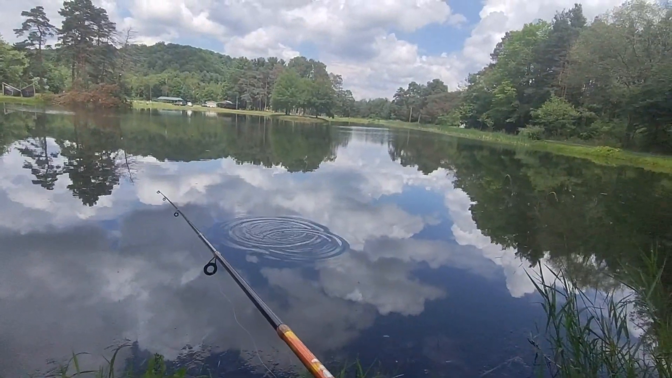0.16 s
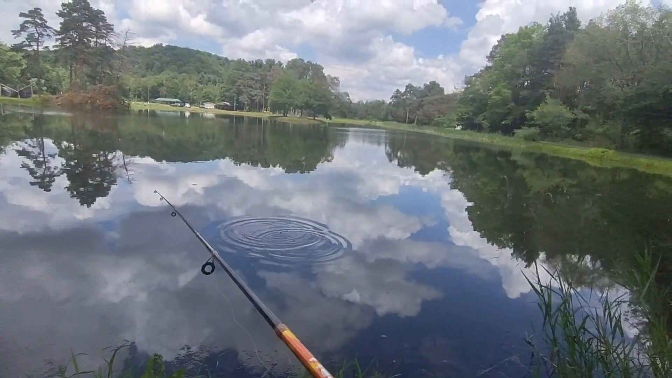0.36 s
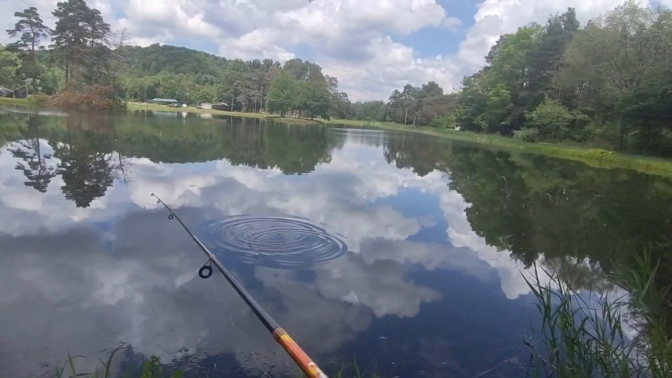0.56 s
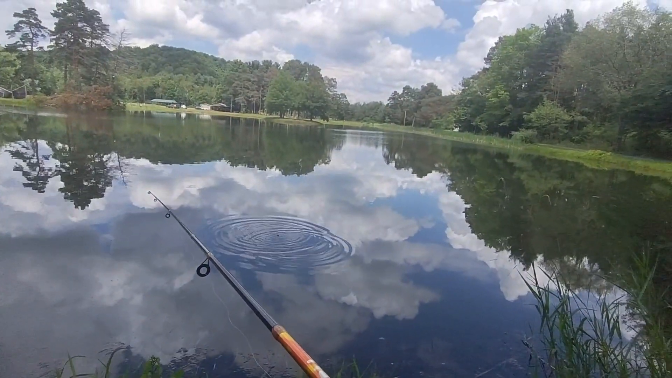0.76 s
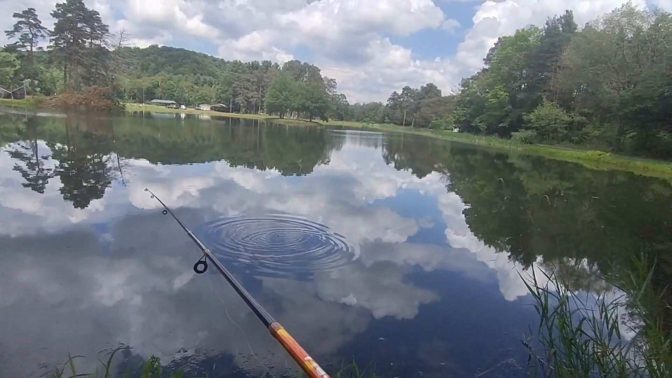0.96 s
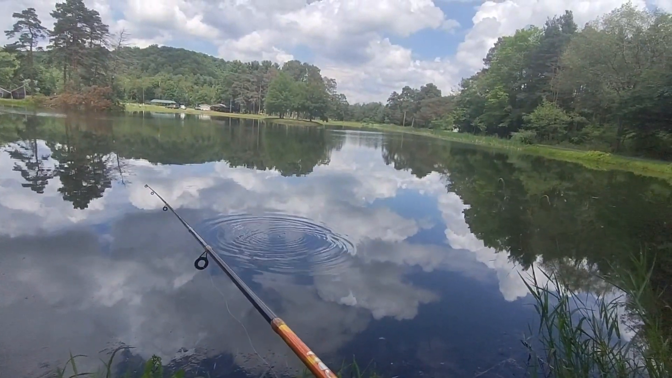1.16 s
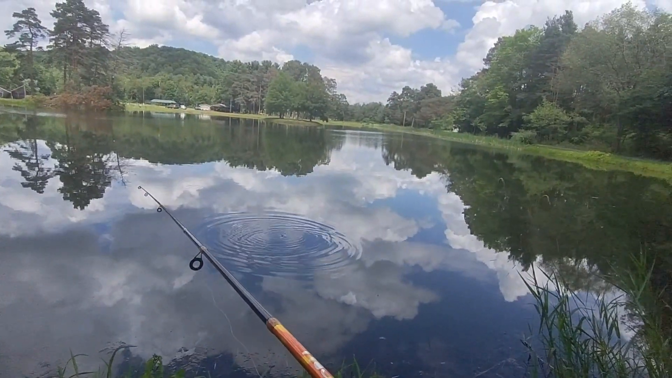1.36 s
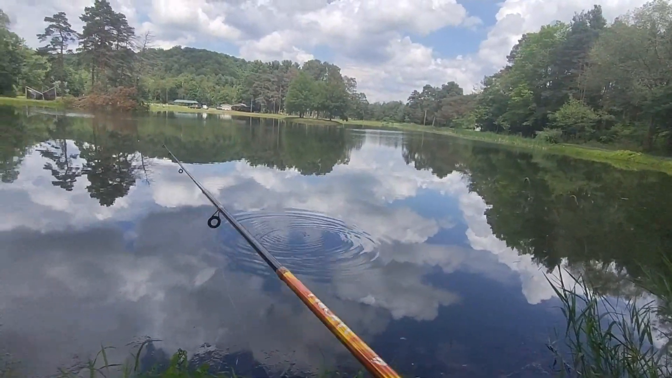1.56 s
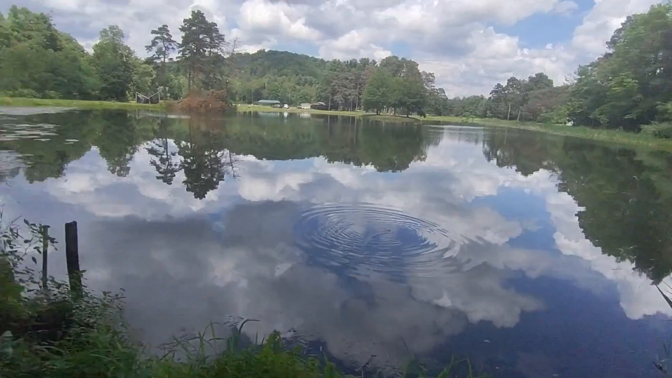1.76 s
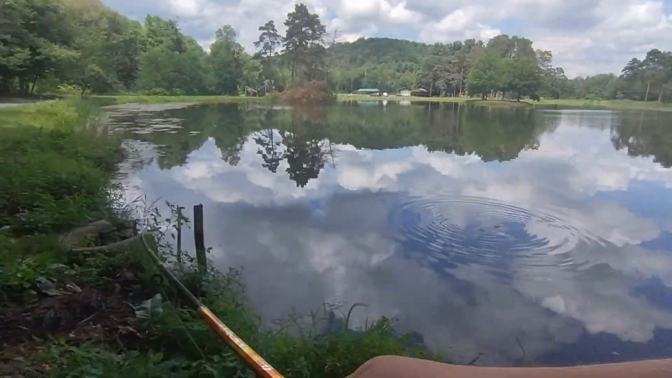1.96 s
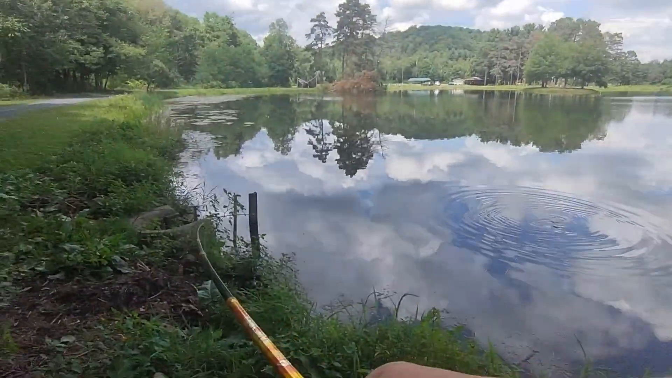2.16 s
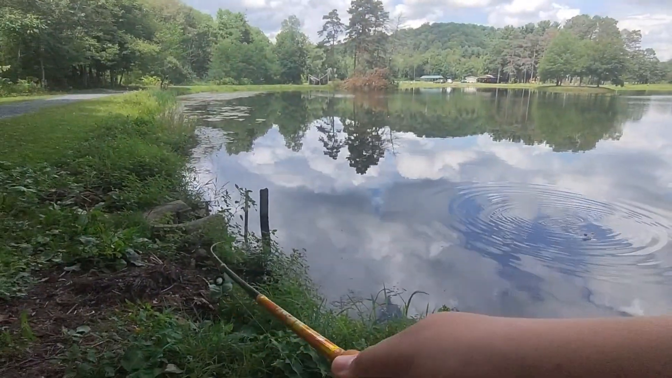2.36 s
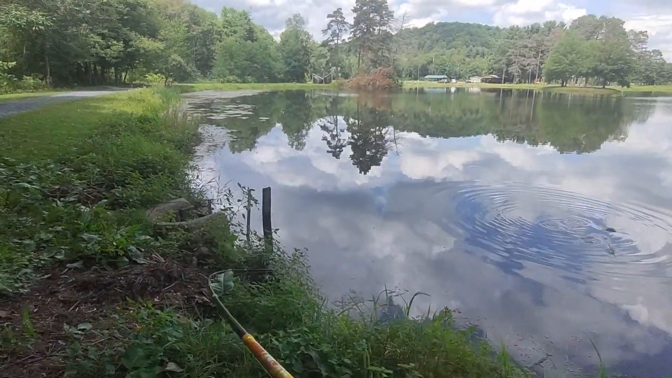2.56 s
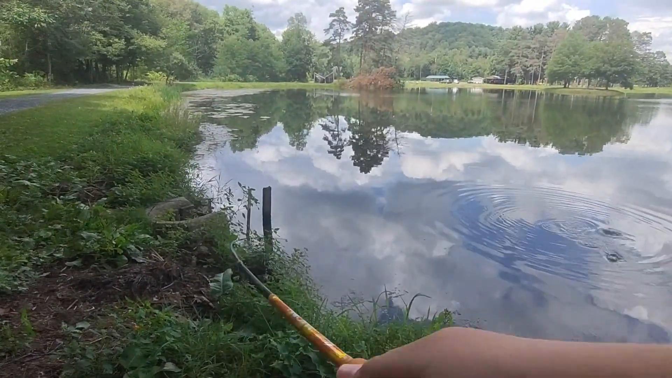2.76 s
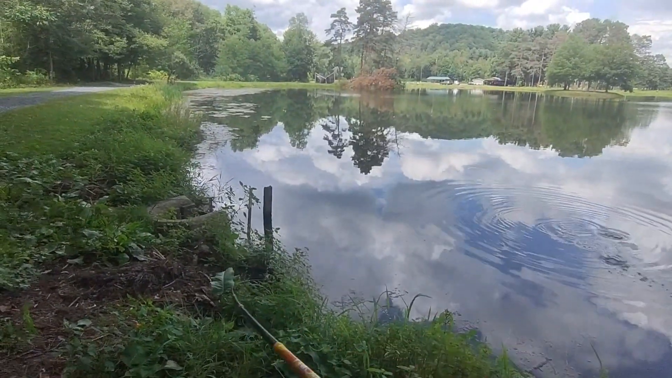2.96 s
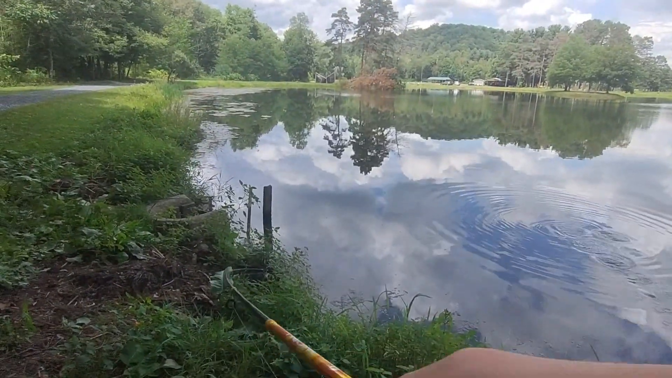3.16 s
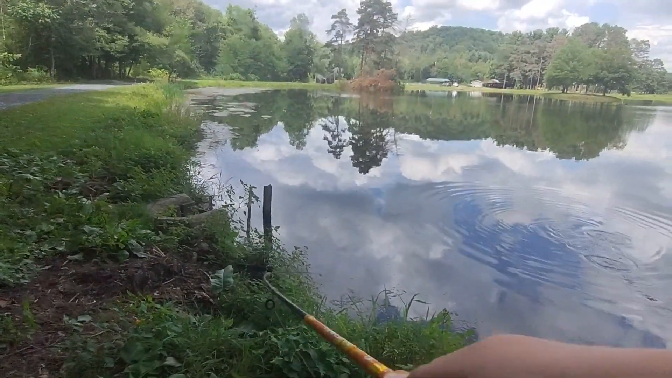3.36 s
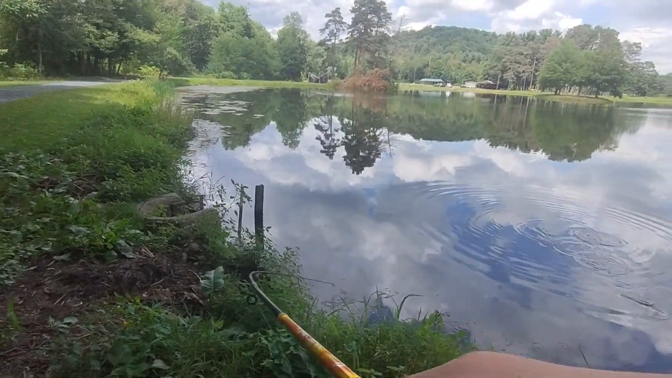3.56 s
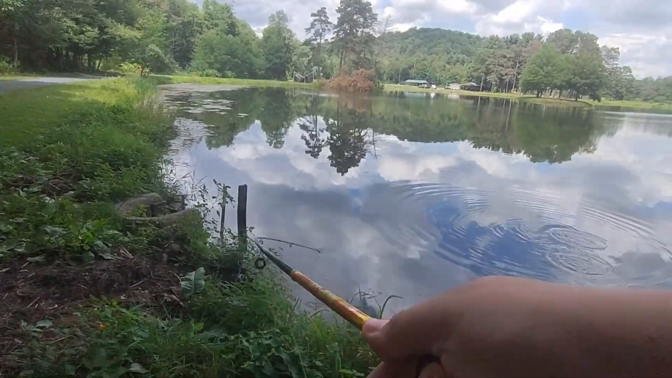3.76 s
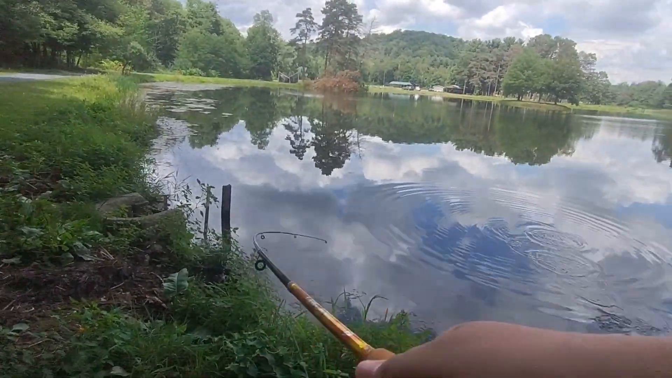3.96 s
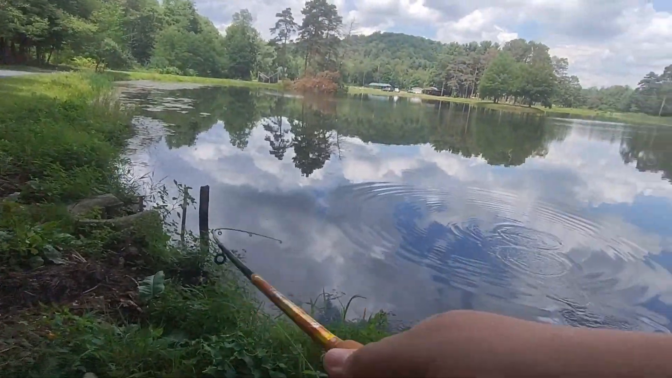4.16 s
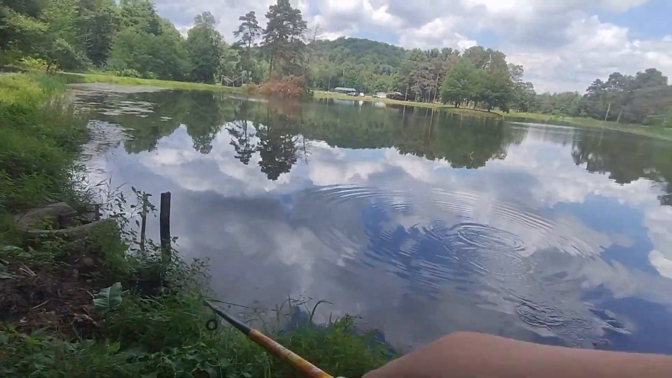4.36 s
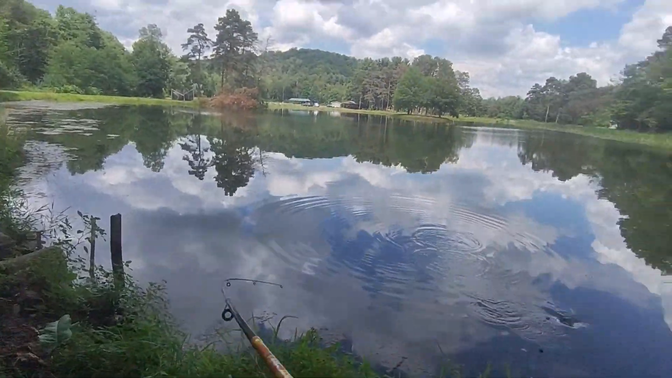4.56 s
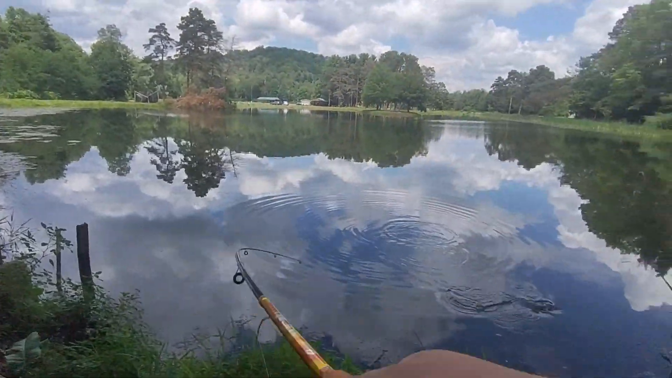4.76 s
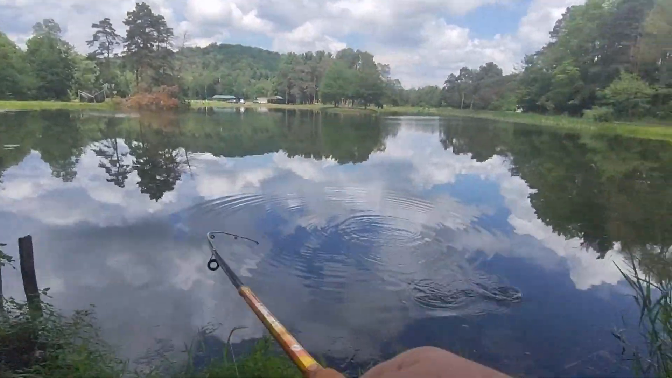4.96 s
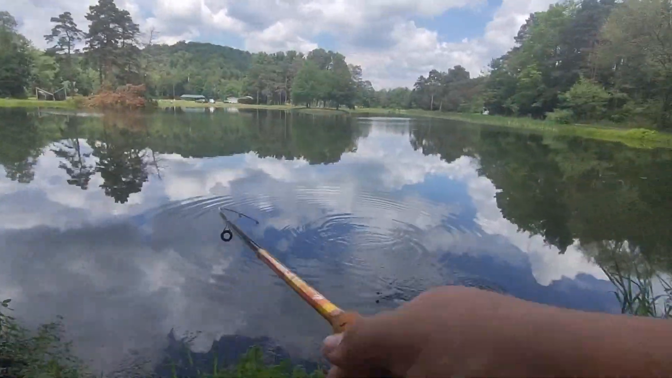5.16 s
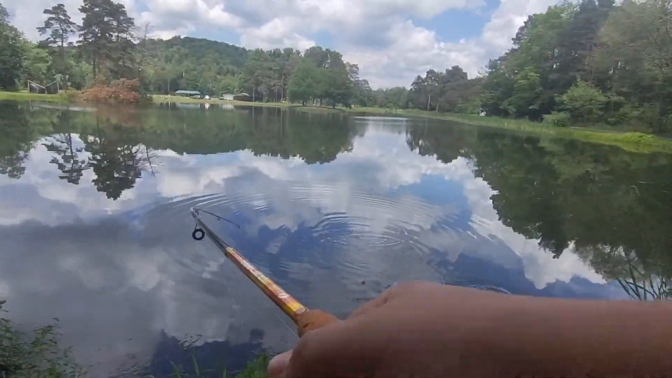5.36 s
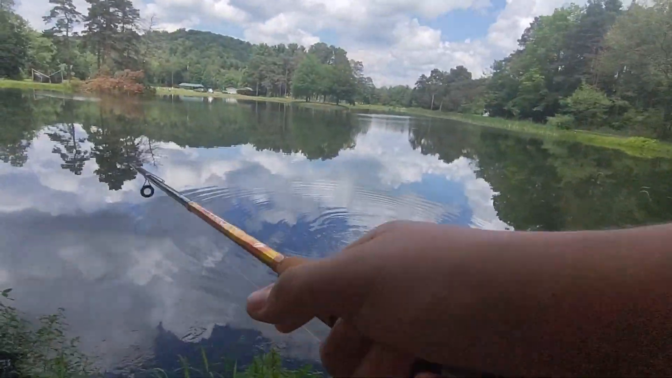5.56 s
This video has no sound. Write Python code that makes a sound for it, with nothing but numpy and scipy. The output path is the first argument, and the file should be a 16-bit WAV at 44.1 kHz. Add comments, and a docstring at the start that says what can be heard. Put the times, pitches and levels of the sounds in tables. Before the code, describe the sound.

A high insect chorus over faint hum, then close grip rustles, bright reel clicks in short bursts, sharp clacks and tiny squeaks.

```python
"""A fishing reel is worked close by: toothed clicks ring its spool in runs, sharp clacks shake it all.
The hand rumbles and rubs, the winding gear hisses, a dry bearing whistles and dull bumps ring briefly.
Beside the pond behind it, insects sing: filtered noise makes a hazy far chorus over a low hum,
wing strokes make one throbbing trill, and a comb of overtones makes one steady buzz.
Two microphone ports hear the treble very differently."""
import sys
import numpy as np
from scipy import signal
from scipy.fft import rfft, irfft, next_fast_len
from scipy.io import wavfile
from scipy.ndimage import uniform_filter1d, map_coordinates

SR = 44100
rng = np.random.default_rng(int(sys.argv[2]) if len(sys.argv) > 2 else 0)


def wav_record(signal):
    """Record a signal, one row per channel, as 16-bit PCM in the file named by sys.argv[1]."""
    frames = np.transpose(np.atleast_2d(signal))
    bounded = np.clip(frames, -1, 1)
    # unit amplitude maps onto the largest positive 16-bit level
    quanta = np.round(bounded * 32767).astype(np.int16)
    wavfile.write(sys.argv[1], SR, quanta)


def volts(x):
    """Linear amplitude factor 10**(x/20) for a level x in dB, scalar or array-like."""
    e = np.asarray(x, float) / 20
    return 10 ** e


N = 247401  # length in samples


def along(points, hz):
    """Reads a curve of (pitch_hz, value) points, spacing pitch as the ear does (log axis)."""
    point_hz, value = np.transpose(points)
    return np.interp(np.log(hz + 1), np.log(point_hz + 1), value)


def curves(rows):
    """Joins the rows by straight lines: one value per sample for each column after the time."""
    time_s, *columns = np.transpose(rows)
    return [np.interp(np.arange(N) / SR, time_s, column) for column in columns]


def unit(x):
    """Scales a sound to rms 1."""
    return x / np.sqrt(np.mean(x ** 2) + 1e-20)


def wobble(rate):
    """A smooth random curve through rate random points a second."""
    points = rng.standard_normal(int(N * rate / SR) + 4)
    return map_coordinates(points, [np.arange(N) * rate / SR])


def filtered(x, response):
    """Multiplies the spectrum of x by a complex response of frequency."""
    size = next_fast_len(N + 8192)
    return irfft(rfft(x, size) * response(np.fft.rfftfreq(size, 1 / SR)), size)[..., :N]


def modes(table):
    """Response of resonances given as (pitch_hz, width_hz, level_db), one row each, with signs alternating."""
    center, width, db = np.transpose(table)[:, :, None]
    sign = (-1.) ** np.arange(len(table))[:, None]
    return lambda f: sign * volts(db) * 1j * f * width / (center * center - f * f + 1j * f * width)


def body(x, table):
    """Sends x through all the resonances, twice, so that the skirts fall steeply."""
    return filtered(x, lambda f: modes(table)(f).sum(0) ** 2)


def rush(spectrum, patchy_db):
    """Stereo noise of rms 1 with patches of random gain; how alike the sides are depends on pitch."""
    # columns: pitch_hz, left-right likeness (1 = same, 0 = unrelated, below 0 = partly opposite)
    likeness = [(60, 0.18), (300, 0.62), (1200, -0.072), (3000, -0.11)]
    grid = signal.stft(rng.standard_normal((2, N)), nperseg=512)[2]
    patches = rng.standard_normal(grid.shape[1:])
    patches = uniform_filter1d(patches, size=6, axis=0)  # spread over pitch
    patches = uniform_filter1d(patches, size=10, axis=1)  # spread over time
    pair = signal.istft(grid * volts(patchy_db * unit(patches)), nperseg=512)[1][:, :N]

    def mid_side(hz):
        angle = np.arccos(np.clip(along(likeness, hz), -1, 1)) / 2
        return volts(along(spectrum, hz)) * [np.cos(angle), np.sin(angle)]

    mid, side = filtered(pair, mid_side)
    return unit(np.array([mid + side, mid - side]))


def pulses(rate, sharp):
    """A peak once per cycle of the rate curve in Hz, narrower as sharp grows."""
    return np.exp(sharp * (np.cos(2 * np.pi * np.cumsum(rate) / SR) - 1))


def later(x, lag_s, own_db):
    """The far port hears x later, with scattered reflections of its own."""
    t = np.arange(400) / SR
    path = volts(own_db - 60 * t / 0.77) * rng.standard_normal(len(t))
    path[0] = 1  # the direct sound
    far = np.pad(x, (round(lag_s * SR), 0))
    return np.array([x, signal.fftconvolve(far, path / np.linalg.norm(path))[:N]])


def air():
    """Distant hum with one low drone, and many far insects merged into a hiss."""
    # background over time: time_s, chorus level_db (raised and wobbled below), far hum level_db
    air_levels = [(0, -43, -66), (.4, -46, -68.5), (1.85, -43, -66), (2.1, -38, -55), (3.4, -38.5, -57),
                  (4.6, -36.5, -58.5), (5.61, -39, -58.5)]
    # tone colour of the hum and of the chorus: pitch_hz, relative level_db per Hz
    hum_colour = [(25, -24), (65, -3), (695, -10.5), (777, -6.5), (991, -15.5), (2150, -9.5), (2690, -25),
                  (3300, -19), (5000, -7), (6500, -39), (11000, -120)]
    chorus_colour = [(2650, -37), (5200, -24.5), (6200, -12), (8300, 0), (9200, -8), (11600, -25),
                     (14200, -23), (14500, -72)]
    chorus_db, hum_db = curves(air_levels)
    near, around = volts(chorus_db + 1.5 + 0.52 * wobble(8.3)) * rush(chorus_colour, patchy_db=2.5)
    chorus = later(near, lag_s=.0005, own_db=-30)
    chorus = chorus + [[0], [.9]] * around  # the right port adds insects of its own
    drone_hz = 65 + 4 * wobble(8)
    drone = volts(-13 + 5 * wobble(12)) * np.sin(2 * np.pi * np.cumsum(drone_hz) / SR)
    hum = rush(hum_colour, patchy_db=2)
    return volts(hum_db) * (hum + drone) + chorus


def trill():
    """Wing strokes, part tone and part rasp, swell and fade in a fast throb."""
    # the song over time: time_s, level_db (raised and wobbled below), pitch_hz (wobbled below)
    trill_line = [(0, -59.5, 7970), (.5, -55, 8080), (.66, -51, 8460), (1.5, -47.5, 8450), (1.8, -46, 8460),
                  (1.92, -73, 8460)]
    # resonances of the rasp: pitch_hz, width_hz, level_db (each applied twice)
    rasp_modes = [(7440, 230, -9), (8580, 240, -9)]
    stroke_hz, throb_hz = 268.3, 51.5 + 0.43 * wobble(4.3)
    level_db, pitch_hz = curves(trill_line)
    strokes = pulses(np.full(N, stroke_hz), sharp=0.46) * pulses(throb_hz, sharp=0.94)
    tone = np.sin(2 * np.pi * np.cumsum(pitch_hz + 20 * wobble(60)) / SR)
    rasp = unit(body(rng.standard_normal(N), rasp_modes))
    song = unit(strokes * (2.6 * tone + rasp))
    return later(volts(level_db + 4.0 + 0.78 * wobble(6.4)) * song, lag_s=.0005, own_db=-26)


def buzz():
    """Regular snaps, built as a comb of overtones; as with echoes, each fades in and out and one region lifts."""
    # the song over time: time_s, level_db (raised below), loudest pitch_hz
    buzz_line = [(0, -72, 9400), (1.85, -62, 9400), (2.6, -48, 8535), (3.4, -46.5, 8545), (4.0, -48, 8985),
                 (4.65, -44, 8985), (4.75, -50, 7350), (5.0, -50, 7000), (5.12, -45, 8610),
                 (5.6, -47, 8560)]
    # snapping speed: time_s, pulses per second
    snap_rate = [(.5, 204.6), (2.6, 203.1), (3.3, 203.5), (4.3, 204.2), (4.7, 204.3), (5.3, 205)]
    # tone colour: pitch_hz, relative level_db
    buzz_colour = [(6400, -17.5), (7200, -12), (8600, -9.5), (9600, -9.5), (10200, -32)]
    level_db, loud_hz = curves(buzz_line)
    rate, = curves(snap_rate)
    turn = 2 * np.pi * np.cumsum(rate) / SR
    song = np.zeros(N)
    for k in range(31, 51):  # only the high overtones
        lift_db = 9 / (1 + ((k * rate - loud_hz) / 150) ** 2)
        fade_db = 3 * wobble(2.5) + 1.5 * wobble(25)
        overtone = np.sin(k * turn + .5 * wobble(5))
        song += volts(along(buzz_colour, k * rate) + lift_db + fade_db) * overtone
    return later(volts(level_db + 8.5) * unit(song), lag_s=.0003, own_db=-45)


def hand():
    """Rumble through the body, grainy rubbing of grip and cloth, and the hiss of the winding gear."""
    # the hand shifts on the grip, each rub a swell: time_s of the peak, rubbing level_db (raised below)
    rubs = [(2.042, -45), (2.284, -47), (2.704, -43), (3.116, -48), (3.31, -51.5), (3.62, -53),
            (3.85, -52.5), (4.753, -46.5), (5.081, -47.5), (5.45, -48)]
    # winding hiss over time: time_s, level_db (raised and wobbled below)
    winding_line = [(2.2, -80), (2.42, -53.5), (2.6, -69.5), (3.0, -53.5), (3.2, -61), (3.35, -53),
                    (3.45, -66), (3.62, -57.5), (3.85, -48.5), (3.91, -65), (4.04, -51), (4.55, -64),
                    (4.75, -58.5), (5.2, -75), (5.6, -57.5)]
    # tone colour of the rumble and of the rubbing: pitch_hz, relative level_db per Hz
    rumble_colour = [(60, -43), (150, 4.5), (380, -1), (900, -30.5), (2000, -20)]
    grip_colour = [(300, -31.5), (780, -6.5), (1300, -8.5), (2450, -0.5), (3000, -9.5), (5000, -8.5),
                   (14200, -16), (14500, -80)]
    # resonance of the winding gear: pitch_hz, width_hz, level_db (applied twice)
    gear_modes = [(3530, 680, 0)]
    rise_s, fall_s = 0.045, 0.047  # of each rub
    louder_s, change_s = 1.857, 0.051  # when the whole scene grows louder, and how fast the rubbing does
    before_db, steady_db = -84, -56  # rubbing level before, and steady level after (raised below)
    t = np.arange(N) / SR
    rubbing = volts(before_db) + volts(steady_db) * (1 + np.tanh((t - louder_s) / change_s)) / 2
    for peak_s, db in rubs:
        width_s = np.where(t < peak_s, rise_s, fall_s)
        rubbing = np.hypot(rubbing, volts(db) * np.exp(-.5 * ((t - peak_s) / width_s) ** 2))
    rubbing_db = 20 * np.log10(rubbing)
    winding_db, = curves(winding_line)
    rumble_db = 0.83 * (rubbing_db + 52.0) - 59.0 + 1.1 * wobble(25)
    rumble = volts(rumble_db) * rush(rumble_colour, patchy_db=4.0)
    grip = volts(rubbing_db + 4.5 + 1.5 * wobble(300)) * rush(grip_colour, patchy_db=4)
    gear = unit(body(rng.standard_normal((2, N)), gear_modes))
    return rumble + grip + volts(winding_db + 6.5 + 4.5 * wobble(40)) * gear


def bumps():
    """Soft contacts on the rod or the body: a few damped cycles and a dull scuff."""
    # start_s, relative level_db, pitch_hz
    bump_list = [(0.976, -49.5, 575), (1.103, -43.5, 460), (1.796, -35.5, 333), (2.07, -35.5, 335),
                 (2.122, -40, 1120), (2.996, -36.5, 790), (5.046, -34, 723), (5.066, -31, 376),
                 (5.076, -32.5, 387), (5.078, -37, 1180), (5.094, -37, 400), (5.096, -39, 1080),
                 (5.291, -42, 960)]
    out, t = np.zeros(N + SR), np.arange(SR // 20) / SR
    for start_s, db, hz in bump_list:
        ring = np.sin(2 * np.pi * hz * t)
        grain = np.hanning(100) * np.sin(3 * np.pi * hz * t[:100]) / 30
        scuff = 1.8 * np.convolve(rng.standard_normal(len(t)), grain, "same")
        fade = volts(db + 1.5 - 60 * t / 0.031) * (1 - np.exp(-t / 0.0012)) ** 2
        out[round(start_s * SR):][:len(t)] += fade * (ring + scuff)
    return out[:N] * volts([[-1.5], [1.5]])  # left, right


def squeaks():
    """A dry bearing whistles briefly: a flat-topped tone with its octave."""
    # start_s, length_s, pitch_hz, relative level_db
    squeak_list = [(2.299, 0.0053, 5240, -30.5), (2.798, 0.0078, 5507, -18), (3.661, 0.0068, 5650, -36),
                   (3.811, 0.0055, 6070, -15), (4.869, 0.0064, 5930, -38.5)]
    out, t = np.zeros(N + SR), np.arange(SR // 20) / SR
    for start_s, length_s, hz, db in squeak_list:
        swell = 1 / (1 + np.exp((.0015 - t) / .0006)) / (1 + np.exp((t - length_s) / .0008))
        turn = 2 * np.pi * hz * t
        octave = .14 * np.exp(-t / .005) * np.sin(2 * turn)
        out[round(start_s * SR):][:len(t)] += volts(db + 4.5) * swell * (np.sin(turn) + octave)
    return later(out[:N], lag_s=0.00013, own_db=-27.0) * volts([[3], [-5]])  # left, right


def blows(events, table, rise_s, fall_s, scatter_db):
    """Each blow is a dying flurry of sharp contacts; it rings every mode at a new strength and pitch."""
    mode_wander = .012  # typical random shift, as a fraction of the pitch
    t = np.arange(-256, 768) / SR
    tail = .2 * np.exp(-np.abs(t) / .008)
    shape = np.where(t < 0, np.exp(t / rise_s), np.exp(-(t / fall_s) ** 2) + tail)
    hz = np.fft.rfftfreq(len(t), 1 / SR)
    out = np.zeros((2, N + len(t)))
    for hit_s, db in events:
        strength, shift = rng.standard_normal((2, len(table), 1))
        ringing = modes(table)(hz * (1 + mode_wander * shift))
        colour = (volts(scatter_db * strength) * ringing).sum(0)
        grit = rng.standard_normal((2, len(t)))
        contacts = shape * grit * np.abs(grit)
        near, other = irfft(rfft(contacts) * colour)
        far = 0.4 * np.roll(near, shift=6) + 2.14 * other  # later, and only partly alike
        loudest = np.sort(np.abs(near))[-8]  # skips the seven most extreme samples
        out[:, round((hit_s + t[0]) * SR):][:, :len(t)] += volts(db) * np.array([near, far]) / loudest
    return out[:, :N]


def teeth(first_s, last_s, count, speed_ratio, first_db, last_db):
    """The spool speeds up or slows evenly during a pull; each tooth comes a little off time and strength."""
    jitter_s, scatter_db = .0005, 2.5
    passed = np.linspace(0, 1, round(count))  # share of the teeth gone by
    speed = np.sqrt(1 - (1 - speed_ratio ** 2) * passed)
    chance = rng.standard_normal((len(passed), 2))
    even_s = first_s + (last_s - first_s) * (1 + speed_ratio) * passed / (1 + speed)
    tooth_s = even_s + jitter_s * chance[:, 0]
    tooth_db = first_db + (last_db - first_db) * passed + scatter_db * chance[:, 1]
    return list(zip(tooth_s, tooth_db))


def reel():
    """The clicker's teeth ring the spool, single clicks without its lowest mode; clacks shake the whole reel."""
    # pulls on the line that run the clicker over its teeth: first tooth start_s, last tooth start_s,
    # teeth, end speed over start speed, first level_db, last level_db (levels before the low cut)
    pulls = [(2.104, 2.161, 6, 0.96, -22.5, -18.5), (2.5603, 2.618, 7, 0.67, -8, -13),
             (3.417, 3.4707, 6, 0.92, -12.5, -13), (3.4802, 3.5592, 9, .98, -10.5, -14),
             (3.76, 3.837, 6, 0.55, -23.5, -11), (3.881, 3.9092, 4, 1.8, -11.5, -10),
             (3.957, 3.978, 3, 0.53, -15.5, -16), (4.336, 4.435, 13, 0.74, -10.5, -15),
             (4.444, 4.58, 12, 0.55, -10.5, -15)]
    # single clicks, alone or standing out within and at the ends of runs:
    # start_s, level_db before the low cut
    ticks = [(2.053, -14.5), (2.0657, -6.5), (2.0705, -17), (2.0745, -19), (2.086, -23), (2.95, -20.5),
             (3.285, -28), (3.3126, -9.5), (3.567, -8), (3.863, -16), (3.926, -14), (4.018, -12),
             (4.235, -28), (4.2868, -14.5), (4.29, -27), (4.326, -16), (4.53, -14), (4.6, -7.5),
             (5.0187, -11.5), (5.0499, -6), (5.566, -14)]
    # sharp clacks as the spool catches: start_s, level_db (raised below)
    clacks = [(2.068, -19), (2.1972, -42), (2.619, -29.5), (3.5678, -35), (4.6006, -34)]
    # resonances of the spool and of the whole reel: pitch_hz, width_hz, level_db
    spool_modes = [(5720, 280, -9.5), (6900, 2200, -18), (8480, 500, -1), (9150, 350, 3), (10500, 500, 1),
                   (11700, 450, -6), (13500, 700, -11)]
    reel_modes = [(2050, 1630, 10.5), (3930, 6000, 11.5), (6000, 4100, 16.5)]
    low_hz = 4900  # the small spool radiates little lower
    run_teeth = sum((teeth(*pull) for pull in pulls), [])
    runs = blows(run_teeth, spool_modes, rise_s=.001, fall_s=.0022, scatter_db=2)
    singles = blows(ticks, spool_modes[1:], rise_s=.0008, fall_s=.0015, scatter_db=2.5)
    clicks = filtered(runs + singles, lambda hz: 1 / (1 + (low_hz / (hz + 1)) ** 10))
    return clicks + volts(4.5) * blows(clacks, reel_modes, rise_s=.0012, fall_s=.003, scatter_db=2)


def scene():
    """All sources added up as they reach the two ports."""
    return air() + trill() + buzz() + hand() + bumps() + squeaks() + reel()


def band_limit(x):
    """A steep low-pass at the top of the band."""
    return signal.sosfilt(signal.butter(12, 15800, fs=SR, output="sos"), x)


def record(dry):
    """The right port is shaded in the treble; both fall off at the bottom and steeply at the top."""
    # pitch_hz, left over right level_db
    port_difference = [(100, -3.5), (500, -1), (2500, 0), (5600, 2), (7200, 14), (8500, 20.5),
                       (11000, 29.5), (14000, 26.5)]
    top_hz, low_hz = 14500, 30

    def ports(hz):
        left_right = [np.ones(len(hz)), volts(-along(port_difference, hz))]
        return left_right / (1 + (hz / top_hz) ** 60) / (1 + (low_hz / (hz + 1)) ** 4)

    return band_limit(filtered(dry, ports))


dry = scene()
out = record(dry)
wav_record(out)
```